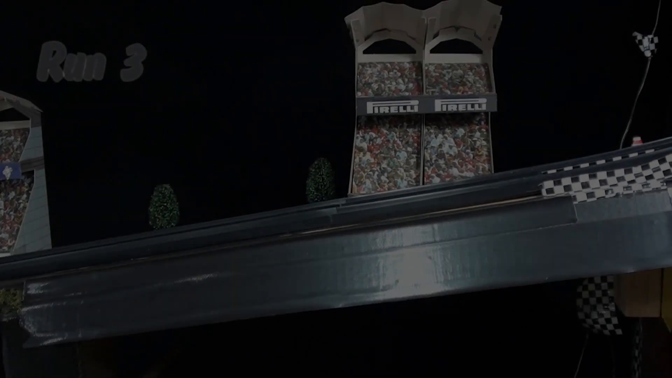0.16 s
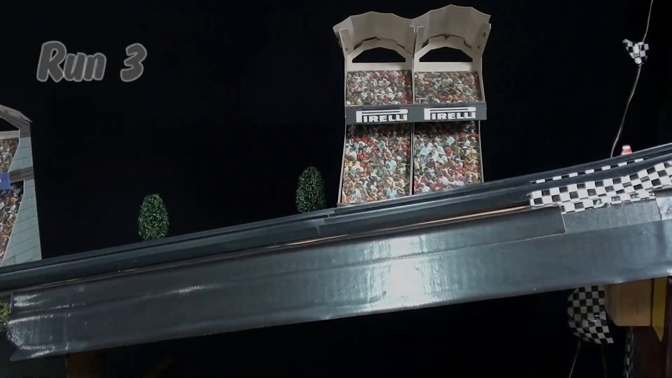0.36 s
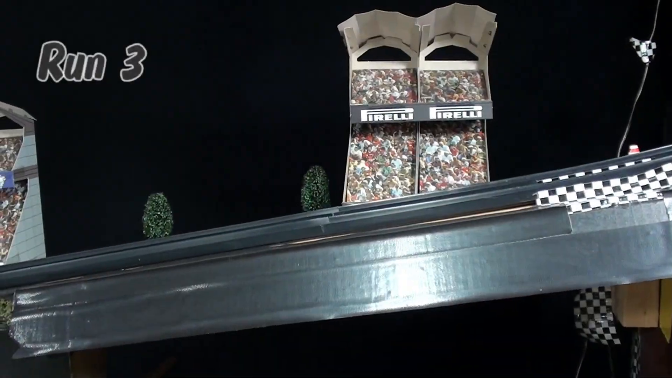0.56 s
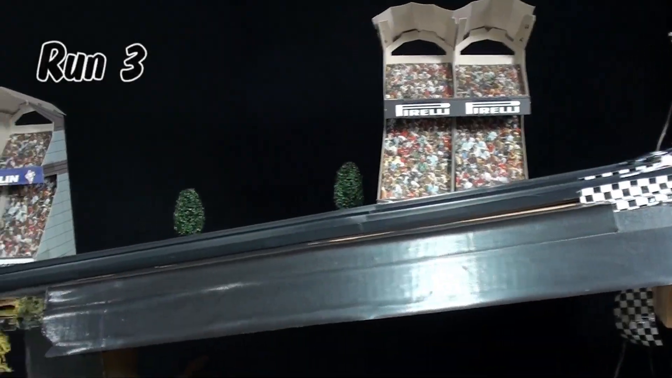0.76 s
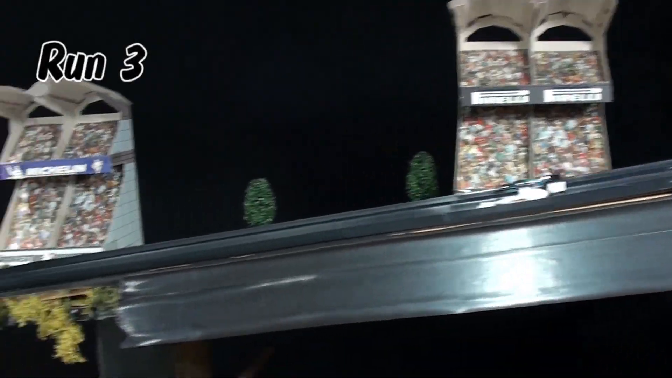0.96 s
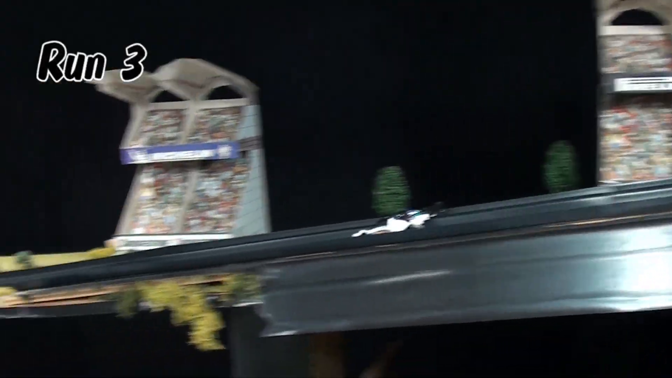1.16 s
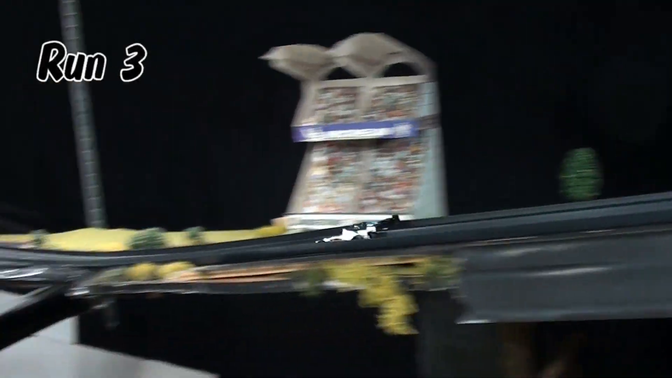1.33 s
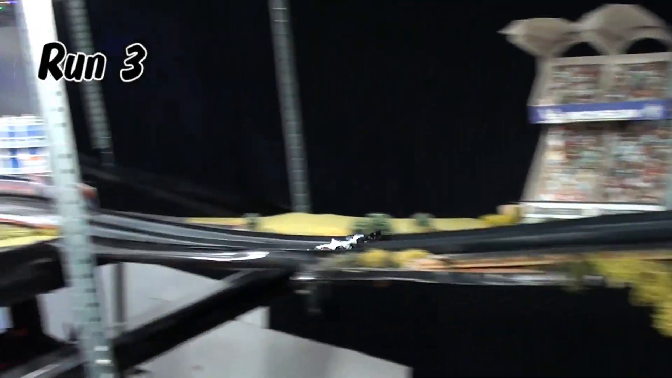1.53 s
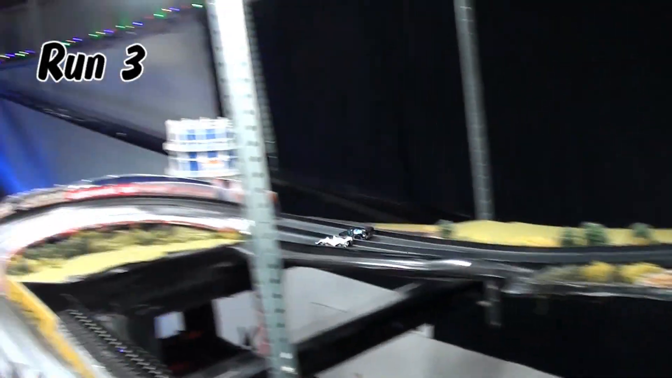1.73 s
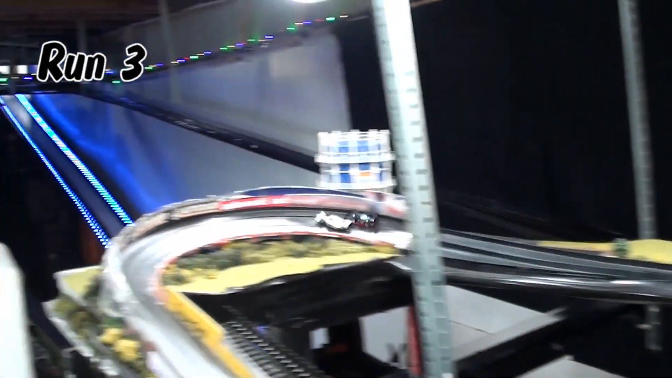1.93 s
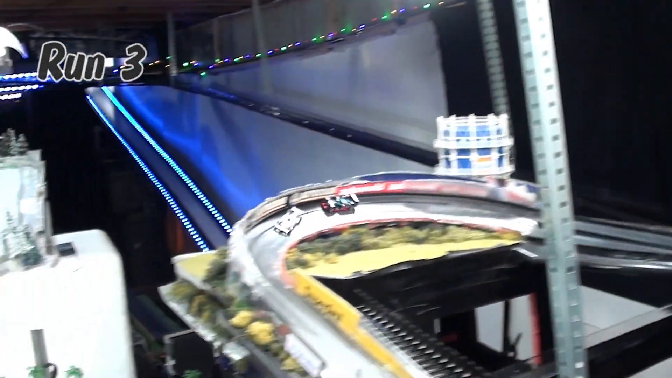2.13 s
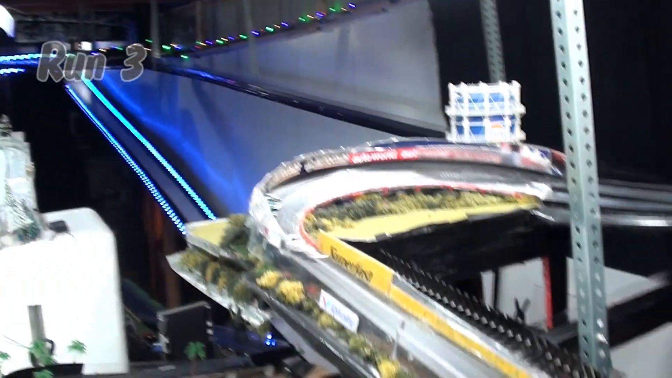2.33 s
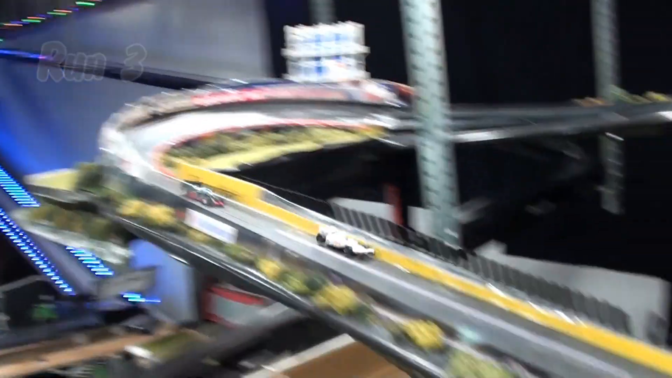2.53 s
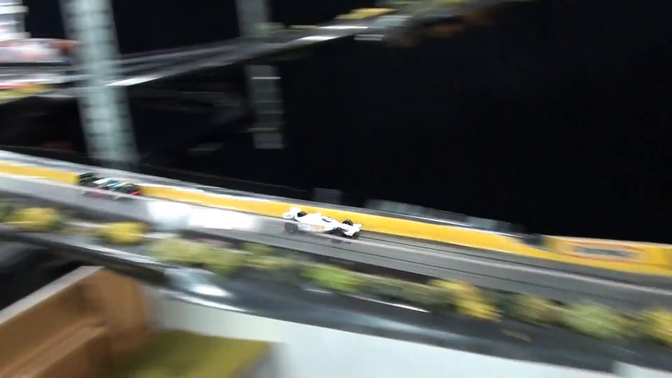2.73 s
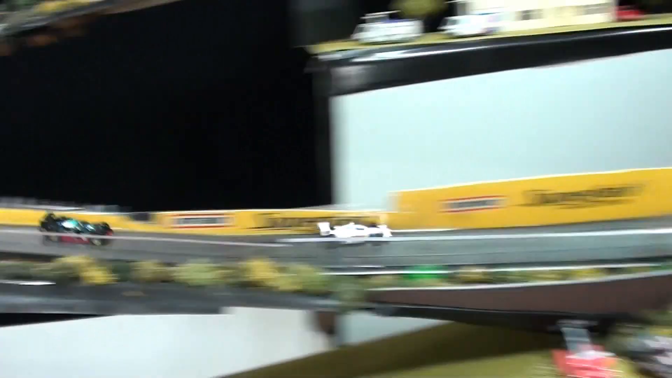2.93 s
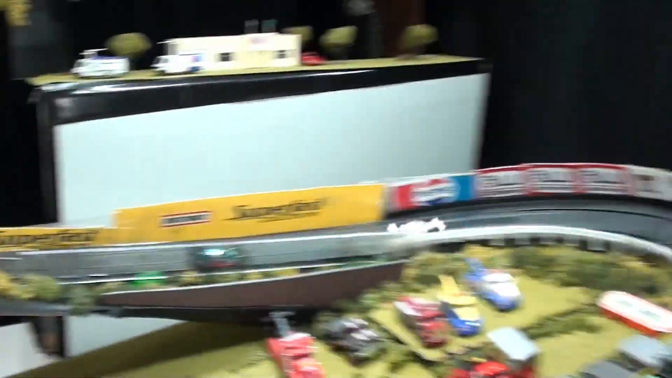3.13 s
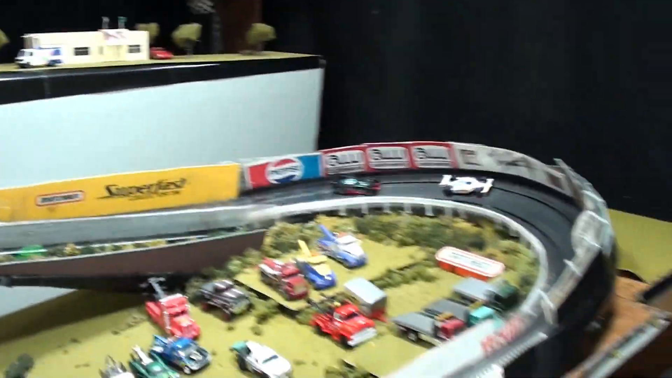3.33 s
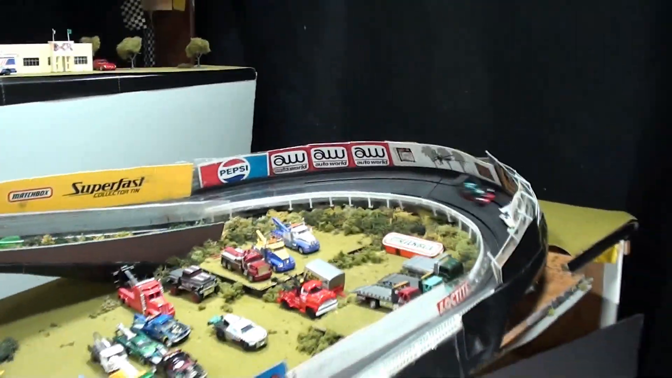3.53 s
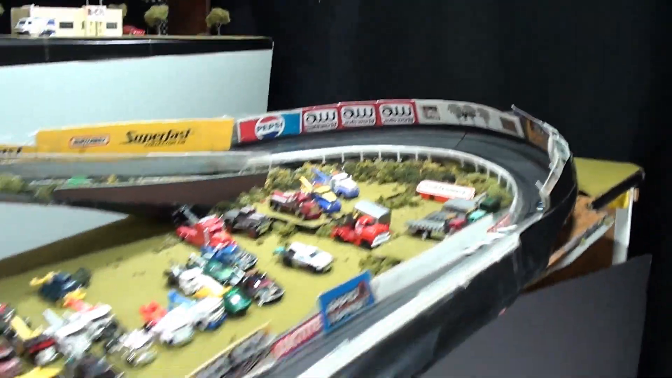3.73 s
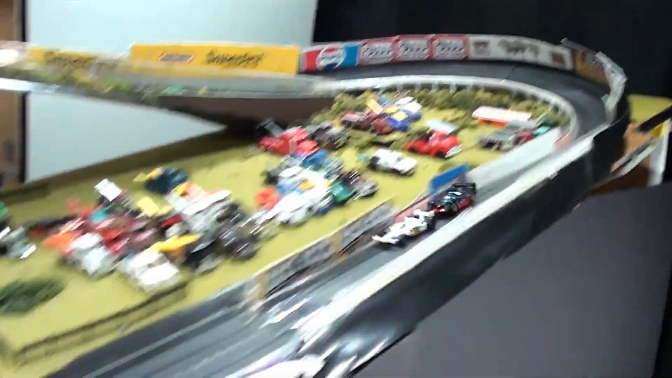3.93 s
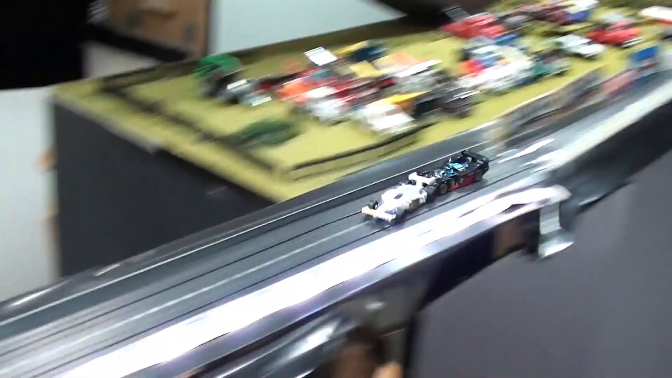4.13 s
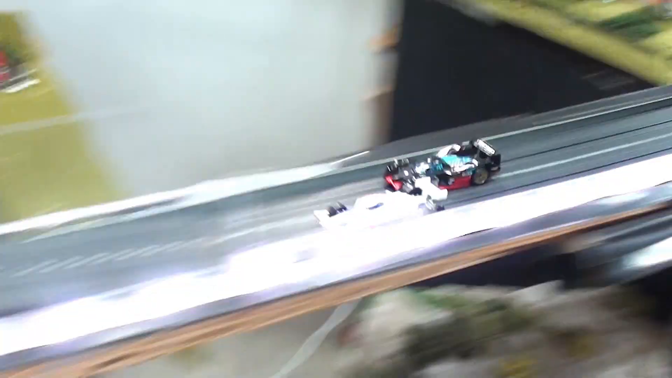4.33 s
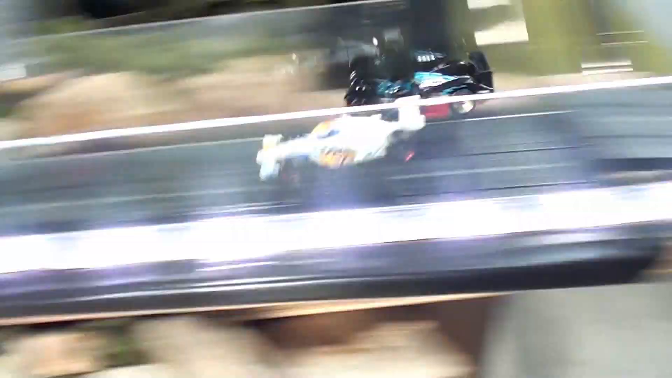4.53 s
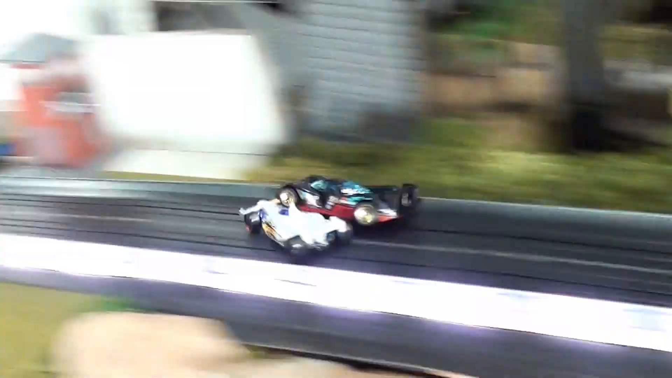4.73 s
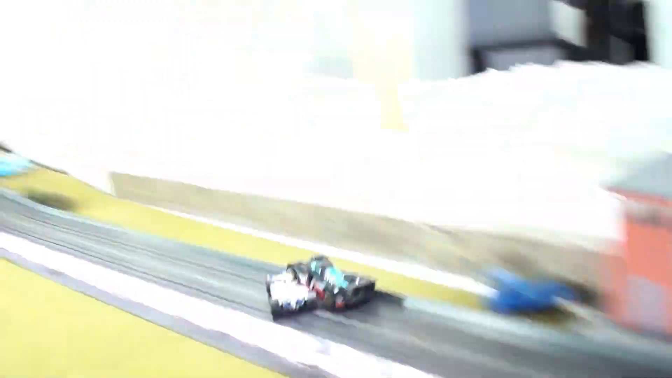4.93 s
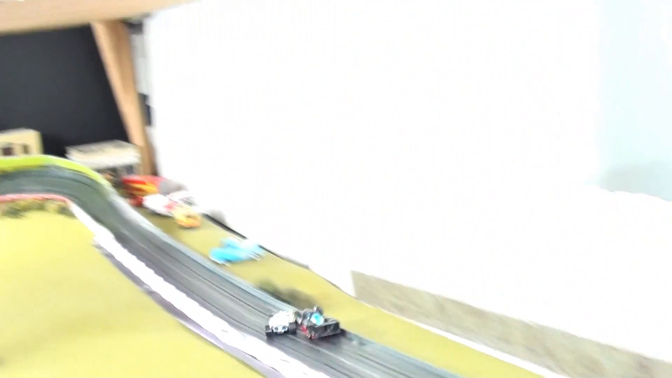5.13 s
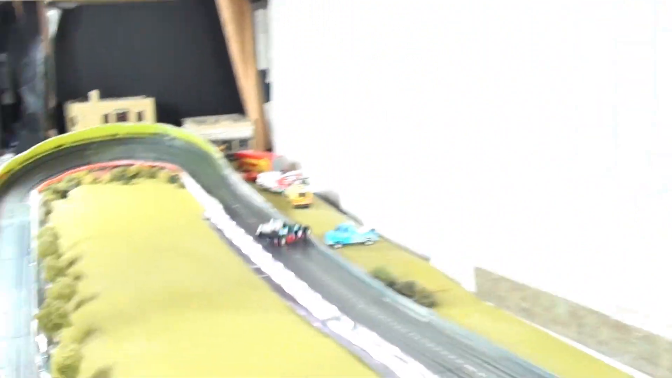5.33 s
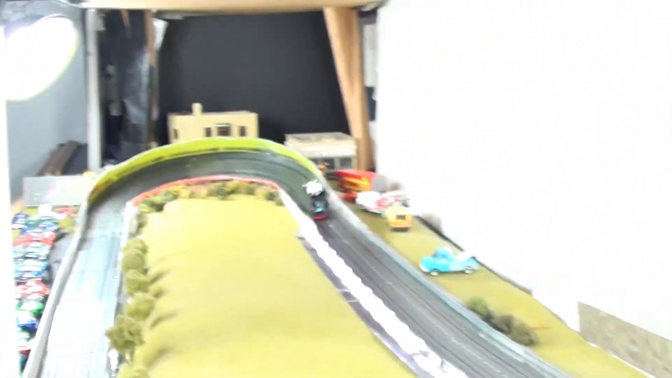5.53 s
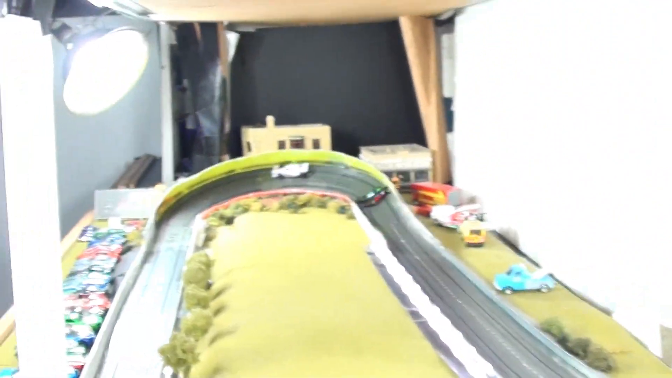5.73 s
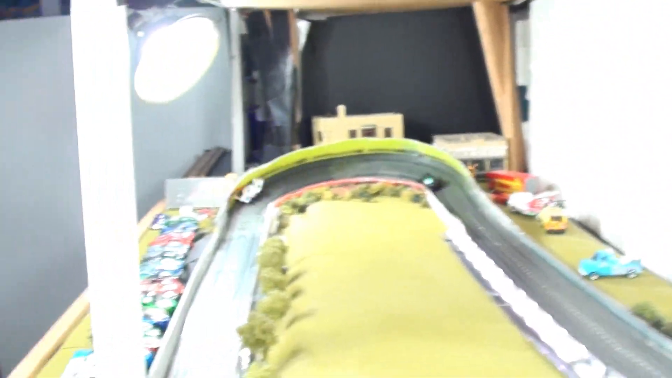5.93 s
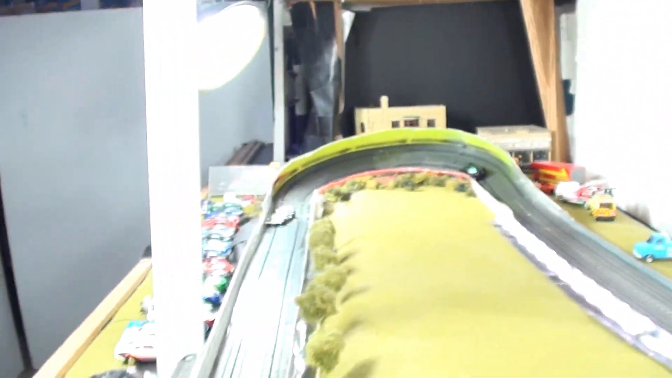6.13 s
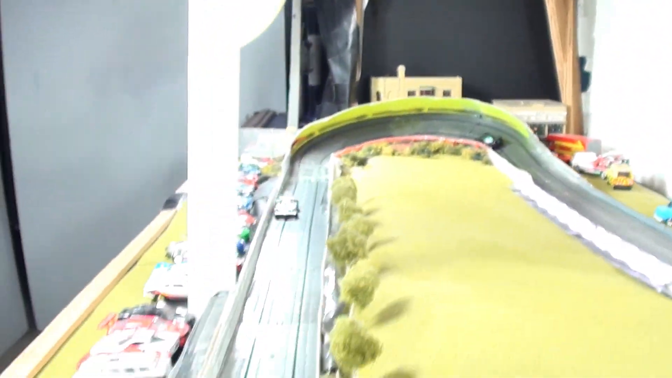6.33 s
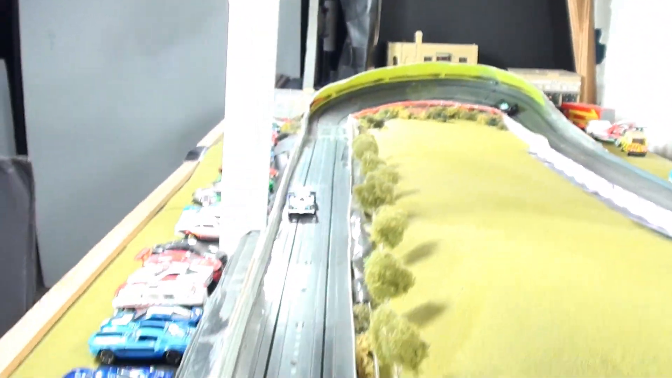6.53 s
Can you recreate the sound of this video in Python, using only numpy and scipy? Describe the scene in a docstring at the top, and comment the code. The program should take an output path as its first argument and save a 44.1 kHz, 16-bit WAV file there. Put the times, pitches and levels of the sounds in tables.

```python
"""Die-cast toy cars race down a long plastic track: random wheel impacts ring each stretch in its own colour.
A starting gate drops with ticks and ringing blows, and quiet noise lies behind it all.
Fuzzy tones sing, whirr, whistle, squeal and drone, and a moving band of wheel noise growls.
Noise bursts clack against rails and other cars, thump over joints and shudder in the track supports.
Brief hops interrupt the rolling and end in a clack; sparse reflections give the room and its width."""
import sys
import numpy as np
from scipy import signal
from scipy.fft import rfft, irfft, next_fast_len
from scipy.io import wavfile
from scipy.ndimage import uniform_filter1d, minimum_filter1d

SR = 44100
rng = np.random.default_rng(int(sys.argv[2]) if len(sys.argv) > 2 else 0)


def wav_record(signal):
    """Record a signal, one row per channel, as 16-bit PCM in the file named by sys.argv[1]."""
    frames = np.transpose(np.atleast_2d(signal))
    bounded = np.clip(frames, -1, 1)
    # unit amplitude maps onto the largest positive 16-bit level
    quanta = np.round(bounded * 32767).astype(np.int16)
    wavfile.write(sys.argv[1], SR, quanta)


N = 289737
TIME = np.arange(N) / SR
BINS = np.fft.rfftfreq(8192, 1 / SR)  # frequency grid of the colours, Hz

# All levels in the tables are relative: the layers are trimmed again in the mix.
# colour of hard contacts: (f/Hz, gain/dB)
CLACK_COLOUR = [(200, -26), (700, -5), (1500, 9), (3000, 7), (4200, 9.5), (7500, 11), (10000, 8.5),
                (13000, 2), (16000, -6)]
# stretches of track: (entry t/s, body level/dB, axle fizz level/dB, chatter depth/dB,
# stray clacks per s, none if negative)
STRETCHES = [(0.0, -35.5, -35.5, 1.5, 0), (1.96, -39.5, -36.5, 2, 6), (2.6, -38.5, -33.5, 2, 6.5),
             (3.22, -37, -33, 2.5, 3), (4.17, -33, -29, 2, 3), (5.29, -35.5, -28, 2.5, 2),
             (5.6, -32.5, -31, 3, 0.5), (6.24, -30.5, -31, 1.5, -1)]
# a car hops and lands: (landing t/s, air time/s, fall of the rolling/dB, landing level/dB, t60/s, ring f/Hz)
HOPS = [(2.557, 0.011, 4, -8, 0.024, 7000), (2.649, 0.027, 8, -12, 0.02, 7500),
        (3.592, 0.013, 10, -18, 0.03, 6700), (4.095, 0.0087, 3, -4.5, 0.03, 7400),
        (4.34, 0.014, 7, -6, 0.022, 11000), (4.6577, 0.056, 15.5, -1, 0.012, 3780),
        (4.729, 0.032, 6.5, -8, 0.019, 2870), (4.902, 0.019, 7, -6, 0.025, 4300),
        (5.2886, 0.026, 8.5, -11.5, 0.04, 4950), (5.5771, 0.02, 6.5, -6, 0.025, 4200),
        (5.61, 0.022, 9.5, -2.5, 0.026, 3890), (5.638, 0.013, 1, -8, 0.025, 4400),
        (5.884, 0.017, 3, -2, 0.016, 4300), (5.915, 0.017, 5, -3, 0.024, 6750),
        (6.025, 0.021, 19, -10, 0.03, 8400), (6.083, 0.012, 3, -8.5, 0.025, 9700),
        (6.1269, 0.019, 22, -7, 0.034, 6300), (6.1857, 0.017, 10, -13, 0.028, 2860),
        (6.2058, 0.017, 7, -12.5, 0.065, 6840), (6.2369, 0.024, 17, -14, 0.035, 7690),
        (6.262, 0.019, 13, -19, 0.03, 3600), (6.409, 0.014, 16, -4, 0.014, 5890),
        (6.4308, 0.011, 19, -19, 0.03, 3850)]


def amp(db):
    """Decibels to gain."""
    return 10 ** (np.asarray(db) / 20)


def evened(x):
    """Scales to an rms of one."""
    return x / np.sqrt(np.mean(x ** 2) + 1e-20)


def read(points, hz):
    """Reads a spectrum on a log-frequency axis."""
    f, value = np.transpose(points)
    return np.interp(np.log(hz + 1), np.log(f + 1), value)


def follow(rows):
    """Each column of a control table at every sample."""
    s, *columns = np.transpose(rows)
    return [np.interp(TIME, s, c) for c in columns]


def during(rows):
    """True between the first and last time of a control table."""
    return (TIME > rows[0][0]) & (TIME < rows[-1][0])


def add(mix, s, sound):
    """Mixes a sound in at time s."""
    part = mix[max(round(s * SR), 0):][:len(sound)]
    part += sound[:len(part)]


def response(db):
    """Minimum-phase impulse response of unit energy, shaped by the gain over BINS."""
    log_gain = np.log(amp(np.maximum(db - db.max(), -100)))
    circle = np.concatenate([log_gain, log_gain[-2:0:-1]])
    spectrum = np.exp(np.conj(signal.hilbert(circle)))
    taps = np.fft.ifft(spectrum).real[:len(BINS) // 2]
    return taps / np.linalg.norm(taps)


def colour(x, db):
    """Rings x through a body with that gain."""
    return signal.oaconvolve(x, response(db))[:len(x)]


def fuzzy_tone(hz, width_hz):
    """A resonance kept ringing by random pushes; hz may be a curve."""
    r = np.exp(-2 * np.pi * width_hz / SR)
    pushes = rng.standard_normal(N) + 1j * rng.standard_normal(N)
    wander = signal.lfilter([1], [1, -2 * r, r * r], pushes)
    carrier = np.exp(2j * np.pi * np.cumsum(hz * np.ones(N)) / SR)
    return evened((wander * carrier).real)


def dying_jolts(jolts, decay_s):
    """Each jolt starts at once and dies away; the result is centred, evened and clipped."""
    shake = signal.lfilter([1], [1, -np.exp(-1 / (decay_s * SR))], jolts)
    return np.clip(evened(shake - shake.mean()), -2, 2)


def chatter(per_s, decay_s):
    """Loose axles jolt at random moments with random strength."""
    jolts = (rng.random(N) < per_s / SR) * rng.uniform(0.082, 1, N)
    return dying_jolts(jolts, decay_s)


def blows(rows, spectrum, rise_s):
    """Each blow is a dying clatter through the struck body, plus one ringing mode."""
    t, out, body = np.arange(SR // 3) / SR, np.zeros(N), response(read(spectrum, BINS))
    for s, db, hz, t60, ring_db in rows:
        fade = amp(db - 60 * t / max(t60, .005)) * (1 - np.exp(-t / rise_s))
        add(out, s, signal.fftconvolve(fade * rng.standard_normal(len(t)), body))
        add(out, s, amp(ring_db) * fade * np.sin(2 * np.pi * hz * t))
    return out


def ambience(db=-60):
    """Low room noise, partly different at each ear, fading in at the start."""
    # colour of the quiet room: (f/Hz, gain/dB)
    room_colour = [(25, -25), (70, -4), (160, -5.5), (400, -1.5), (800, -10.5), (1500, -16), (4500, -19),
                   (9000, -22), (15500, -26)]
    shared, left, right = (colour(rng.standard_normal(N), read(room_colour, BINS)) for _ in range(3))
    fade_in = np.clip((TIME - .38) / 0.033, 0, 1)
    return amp(db) * (shared + 0.31 * np.array([left, right])) * fade_in


def gate():
    """The dropping gate is struck several times, each blow a noise burst with a ringing mode."""
    # blows of the gate: (t/s, level/dB, ring f/Hz, t60/s, ring level/dB)
    gate_blows = [(0.4425, -26, 1190, 0.2, -8), (0.4625, -29, 940, 0.05, -13),
                  (0.4655, -18.5, 3240, 0.053, 0), (0.503, -35, 837, 0.32, -3),
                  (0.5695, -27, 740, 0.094, 3), (0.582, -26.5, 356, 0.18, -1),
                  (0.69, -24.5, 3230, 0.12, -1)]
    # colour of the gate: (f/Hz, gain/dB)
    gate_colour = [(40, -37), (100, -28), (350, -4), (550, -5), (800, 3), (1200, -3), (1800, -4),
                   (3300, -3), (4500, -8), (8000, -9), (11000, -23), (15500, -25)]
    return blows(gate_blows, gate_colour, rise_s=0.00066)


def latch():
    """Single impulses tick as the gate lets go, hits its stop and frees the cars."""
    # ticks: (t/s, level/dB)
    ticks = [(0.4428, -27), (0.4655, -15.5), (0.472, -26), (0.578, -33), (0.587, -32), (0.688, -30),
             (0.705, -29)]
    out = np.zeros(N)
    for s, db in ticks:
        add(out, s, amp(db) * response(read(CLACK_COLOUR, BINS)))
    return out


def stretch_at(s):
    """Number of the stretch of track that the cars are on at time s."""
    return np.searchsorted([row[0] for row in STRETCHES[1:]], s)


def surface():
    """Body level, fizz level and chatter depth under the cars, blending from stretch to stretch."""
    return uniform_filter1d(np.array(STRETCHES)[stretch_at(TIME), 1:4].T, SR // 20, axis=1)


def contact():
    """The cars set off; the rolling falls away while they are in the air and returns as they land."""
    db = np.zeros(N)
    for landing_s, air_s, fall_db, *_ in HOPS:
        add(db, landing_s - air_s, -fall_db * np.sqrt(np.linspace(0, 1, round(air_s * SR))))
    set_off = np.clip((TIME - .565) / 0.038, 0, 1)
    return amp(uniform_filter1d(db, SR // 700)) * set_off


def patter(per_s, spread_db):
    """Random tiny impacts of uneven strength."""
    size = amp(spread_db * np.clip(rng.standard_normal(N), -2, 2)) * rng.choice([-1, 1], N)
    return evened(size * (rng.random(N) < per_s / SR))


def shifting(x, patch_hz=420, patch_s=.014, depth_db=2.5):
    """Each spot under the wheels favours other modes of the track, so brief resonances come and go."""
    hz, t, z = signal.stft(x, SR, nperseg=512, noverlap=384)
    patches = rng.standard_normal(z.shape)
    patches = uniform_filter1d(patches, max(round(patch_hz / hz[1]), 1), axis=0)
    patches = uniform_filter1d(patches, max(round(patch_s / t[1]), 1), axis=1)
    z = z * amp(depth_db * np.clip(evened(patches), -2, 2))
    return evened(signal.istft(z, SR, nperseg=512, noverlap=384)[1][:N])


def wobble(wander_depth=.25, jolt_s=0.0039, spread_db=6):
    """Each car jolts on its loose axles about once a wheel turn, never quite evenly."""
    # mean wobble rate of each of two cars: [f/Hz]
    wobble_hz = [68.3, 111.9]
    jolts = np.zeros(N)
    for hz in wobble_hz:
        wander = evened(uniform_filter1d(rng.standard_normal(N), SR // 60))
        turns = np.cumsum(hz * np.exp(wander_depth * wander)) / SR + rng.random()
        new_turn = np.diff(np.floor(turns), prepend=0)
        jolts += new_turn * amp(spread_db * rng.standard_normal(N))
    return dying_jolts(jolts, jolt_s)


def wheels():
    """The tiny impacts of the wheels, bunched into a rattle by the wobble of the axles."""
    shake = amp(surface()[2] * wobble())
    shake /= np.sqrt(uniform_filter1d(shake ** 2, SR // 30))  # jolts bunch the energy without adding any
    return shifting(patter(per_s=5500, spread_db=3.0)) * shake * contact()


def scraping(decay_s=0.11):
    """Lift of the fizz in dB as cars scrape along a rail: it jumps up and dies away."""
    # scrapes: (t/s, lift/dB)
    scrapes = [(1.47, 7), (1.71, 5), (1.98, 6), (3.211, 6)]
    lift = np.zeros(N)
    for s, lift_db in scrapes:
        add(lift, s, lift_db * np.exp(-TIME / decay_s))
    return lift


def band_levels(body_db, fizz_db):
    """Levels of rumble, body, rush and fizz: one drive moves the upper three, each by its own amount."""
    # how loudly the cars roll, with their speed and nearness: (t/s, level/dB)
    drive_curve = [(0.63, -29), (0.71, -18), (0.81, -17.5), (0.87, -13), (1.15, -7), (1.4, -6.5),
                   (1.74, -2), (2.1, -0.5), (2.39, 2.5), (2.58, -2.5), (2.78, 1), (2.92, 0), (3.14, 3.5),
                   (3.28, -5), (3.44, -5.5), (3.6, -1), (3.72, -0.5), (4.07, -4.5), (4.22, 0), (4.48, 2.5),
                   (4.7, -1.5), (4.9, 2.5), (5.45, 0.5), (5.68, -1), (5.9, -3), (6.2, -4.5), (6.3, -3),
                   (6.39, -7), (6.47, -3.5), (6.55, -4)]
    # rumble of the deck, strongest where the track is loosely held: (t/s, level/dB)
    rumble_curve = [(0.6, -52), (1.35, -51), (1.6, -45.5), (2.0, -41), (2.22, -49.5), (2.55, -45.5),
                    (2.85, -42), (3.1, -47), (3.36, -38), (3.7, -51.5), (4.03, -42.5), (4.18, -54),
                    (4.5, -50), (4.72, -40.5), (4.85, -45), (5.2, -49.5), (5.45, -45.5), (5.72, -39),
                    (6.05, -43.5), (6.3, -53.5)]
    body_slope, fizz_slope = 0.67, 1.03  # dB per dB of drive: faster cars sound brighter
    rush_db = -26.5  # at a drive of 0 dB
    uneven_db, uneven_s = 1.5, 0.054  # the deck answers more or less from spot to spot
    drive_db, = follow(drive_curve)
    rumble_db, = follow(rumble_curve)
    spots = rng.standard_normal((2, 1000))
    low_db, middle_db = (uneven_db * np.interp(TIME / uneven_s, np.arange(len(row)), row) for row in spots)
    return [rumble_db + low_db,
            body_db + body_slope * drive_db + middle_db,
            rush_db + drive_db,
            fizz_db + fizz_slope * drive_db + scraping()]


def rolling(drive, splits_hz=(700, 2500, 7500)):
    """The wheel impacts ring the stretch of track that the cars are on."""
    # colour of each stretch: (f/Hz, gain/dB)
    ramp = [(35, -51), (60, -38), (183, -19.5), (220, -23.5), (423, -17), (559, -25.5), (673, -14.5),
            (792, -13.5), (1100, -4.5), (1200, -7), (1290, -3), (2250, 0.5), (3500, -1.5), (6560, -3),
            (15500, -25)]
    first_bend = [(24, -63.5), (40, -37), (93, -36), (126, -45), (192, -12), (461, -15), (722, -13),
                  (838, -11), (926, -2.5), (1490, -4), (6160, 3.5), (8520, 3), (15500, -5)]
    back_straight = [(35, -64), (60, -30.5), (123, -26), (192, -4), (312, -2), (343, -5), (509, 0),
                     (585, -2), (673, -3), (756, 2.5), (3270, -1), (7370, -4), (15500, -22.5)]
    second_bend = [(40, -42.5), (70, -27), (140, -30), (206, -20.5), (327, -16.5), (546, -20.5),
                   (627, -18.5), (1020, -2), (1960, -4), (2980, 8.5), (4200, 13), (6870, 14.5), (10900, 8),
                   (15500, -4.5)]
    near_straight = [(35, -65), (60, -37), (132, -19.5), (192, -21.5), (226, -14.5), (312, -18.5),
                     (359, -18.5), (627, -14.5), (792, -8.5), (869, -8), (1380, -2), (2250, 1.5),
                     (4120, 10), (7200, 4.5), (15500, -20)]
    approach = [(35, -60), (60, -38), (132, -20), (300, -12), (600, -16), (1150, -10), (1450, -3.5),
                (2100, -4), (2800, -2.5), (4000, 4), (5500, 2), (6900, 0), (9000, -4.5), (15500, -23.5)]
    last_bend = [(35, -45), (60, -33), (123, -13.5), (180, -8), (226, -7), (312, -1.5), (403, -8.5),
                 (546, -10), (721, -12), (1070, -8), (1230, -1.5), (2590, -6), (3930, -2), (8090, -6),
                 (11000, -15.5), (15500, -27)]
    run_out = [(35, -54), (60, -12), (312, -13), (385, -19), (486, -9.5), (642, -21), (688, -9), (738, -21),
               (810, -12), (1320, -12.5), (1550, -2.5), (2050, -8), (4220, 4), (7720, -3), (15500, -27)]
    # resonances and dips in those colours: (stretch number, f/Hz, width/Hz, lift/dB)
    resonances = [(0, 430, 70, 4), (0, 680, 90, 3), (1, 763, 80, 8.5), (3, 544, 60, 7), (4, 781, 110, -5),
                  (4, 1430, 200, 4), (4, 1690, 250, 5.5), (4, 7600, 500, -3), (5, 760, 70, 10),
                  (5, 3850, 400, 2.5), (6, 726, 80, 7.5), (7, 1670, 300, -3.5), (7, 2850, 302, 4),
                  (7, 3920, 600, 5), (7, 6100, 503, 5)]
    spectra = [ramp, first_bend, back_straight, second_bend, near_straight, approach, last_bend, run_out]
    body_db, fizz_db, _ = surface()
    stretch = stretch_at(TIME)
    below = [0 * BINS] + [1 / (1 + (BINS / hz) ** 12) for hz in splits_hz] + [1 + 0 * BINS]
    shares_db = 10 * np.log10(np.abs(np.diff(below, axis=0)) + 1e-12)  # rumble, body, rush and fizz
    parts = np.zeros((len(shares_db), N))
    for k, spectrum in enumerate(spectra):
        peaks_db = sum(lift / (1 + (2 * (BINS - hz) / width) ** 2)
                       for at, hz, width, lift in resonances if round(at) == k)
        here = uniform_filter1d(1. * (stretch == k), SR // 20)  # one stretch blends into the next
        on = np.flatnonzero(here > 1e-6)
        for part, share_db in zip(parts, shares_db):
            track = response(read(spectrum, BINS) + peaks_db + share_db)
            add(part, on[0] / SR, signal.fftconvolve(drive[on] * np.sqrt(here[on]), track))
    return amp(-2.5) * (amp(band_levels(body_db, fizz_db)) * parts).sum(0)


def singing():
    """Metal bodies and axles ring in thin lines down the ramp, fading out as the first bend begins."""
    # modes of the cars: (f/Hz, width/Hz, level/dB)
    chassis = [(2180, 50, -9), (3100, 160, -1), (4500, 190, -7), (5620, 84, -11.5), (6400, 130, -8),
               (8120, 230, -7), (10600, 110, -20)]
    # strength of the singing: (t/s, level/dB)
    strength = [(0.57, -63), (0.6, -60), (0.85, -38.5), (1.2, -35.5), (1.6, -30), (1.95, -42), (2.1, -60)]
    db, = follow(strength)
    lines = sum(amp(mode_db) * fuzzy_tone(hz, width_hz) for hz, width_hz, mode_db in chassis)
    return during(strength) * amp(db) * lines


def whistle(flicker_db=2.5):
    """A dry axle whistles thinly and fitfully on the ramp, as one narrow resonance."""
    # strength of the whistle: (t/s, level/dB)
    strength = [(0.575, -72), (0.595, -64), (0.72, -61), (1.05, -51.5), (1.5, -50.5), (2.05, -62)]
    db, = follow(strength)
    flicker = evened(amp(flicker_db * chatter(per_s=27, decay_s=.03)))
    return amp(db) * flicker * fuzzy_tone(9305, width_hz=28) * during(strength)


def squeals():
    """A dry axle catches and rings for a moment, each time at another pitch."""
    # squeals: (t/s, length/s, f/Hz, level/dB)
    catches = [(0.585, 0.056, 6650, -50), (0.672, 0.045, 6860, -43), (0.795, 0.14, 1890, -40),
               (1.154, 0.018, 4495, -30), (2.356, 0.063, 5330, -30), (4.598, 0.023, 3500, -35),
               (4.996, 0.035, 7200, -21), (5.102, 0.022, 3990, -23), (5.124, 0.062, 2930, -26.5),
               (5.185, 0.04, 7250, -28), (5.358, 0.14, 6820, -26), (5.72, 0.029, 3950, -22),
               (6.432, 0.12, 4050, -29)]
    hz, level = np.zeros(N), np.zeros(N)
    for s, length_s, pitch_hz, db in catches:
        swell = np.sin(np.linspace(0, np.pi, round(length_s * SR)))
        add(level, s, amp(db) * swell)
        hz[round(s * SR):] = pitch_hz
    return level * fuzzy_tone(hz, width_hz=170)


def whirr(rough_db=2.5):
    """Wheels and smooth ramp ring with a rasp, in swells whose pitch sinks as the slope flattens out."""
    # swells of the whirr: (t/s, f/Hz, level/dB)
    swells = [(0.68, 1957, -47), (0.85, 1950, -40.5), (1.0, 2087, -52.5), (1.08, 2365, -35),
              (1.2, 2210, -43), (1.32, 2190, -33), (1.46, 2150, -40), (1.5, 2124, -26.5), (1.55, 2150, -43),
              (1.64, 2207, -31), (1.72, 2153, -35), (1.79, 1966, -34), (1.85, 1700, -47), (1.92, 1600, -56)]
    # its resonances: (multiple of its pitch, width/Hz, level/dB)
    modes = [(1.0, 212, 1.5), (1.4, 240, -6.5)]
    hz, db = follow(swells)
    ring = sum(amp(mode_db) * fuzzy_tone(multiple * hz, width_hz) for multiple, width_hz, mode_db in modes)
    rasp = evened(amp(rough_db * chatter(per_s=99, decay_s=0.0065)))
    return amp(db) * ring * rasp * during(swells)


def growl(drive):
    """The wheels drive one broad resonance of the track bed, which moves as the cars travel."""
    # swells where the cars press into the bed: (t/s, centre f/Hz, level/dB)
    swells = [(0.7, 1050, -53), (0.85, 1160, -38.5), (1.0, 1400, -57), (1.62, 2180, -36.5),
              (1.73, 2070, -29), (1.83, 1650, -32), (1.94, 1520, -33), (1.99, 1200, -44),
              (2.68, 2180, -35.5), (2.78, 2180, -36), (2.96, 1770, -30.5), (3.14, 1380, -34.5),
              (3.3, 1300, -43.5), (4.14, 1880, -34.5), (4.21, 1680, -31), (4.29, 1700, -30),
              (4.36, 1580, -41.5), (4.95, 1680, -37), (5.06, 1856, -34), (5.2, 1800, -47.5)]
    # half width of the band, narrowest on the ramp: (t/s, width/octaves)
    half_width = [(1.9, 0.56), (2.7, .62)]
    centre_hz, db = follow(swells)
    hz, t, z = signal.stft(drive, SR, nperseg=512, noverlap=384)
    octaves_off = np.log2((hz[:, None] + 1) / np.interp(t, TIME, centre_hz))
    width_octaves = np.interp(t, *np.transpose(half_width))
    band = 1 / (1 + np.abs(octaves_off / width_octaves) ** 4)
    band /= np.sqrt(np.mean(band ** 2, axis=0))
    return amp(db) * signal.istft(z * band, SR, nperseg=512, noverlap=384)[1][:N]


def thumps():
    """Wheels cross a joint, or a car lurches into motion: a soft-edged noise burst and a ringing mode of the
    deck."""
    # bumps over joints, the first as the second car sets off: (t/s, level/dB, ring f/Hz, t60/s, ring level/dB)
    bumps = [(0.835, -30, 1180, 0.25, -5), (1.102, -22.5, 670, 0.11, 7), (1.14, -27, 566, 0.056, 2),
             (1.445, -27, 978, 0.095, 7), (1.898, -22.5, 885, 0.24, 5.5), (2.057, -17, 718, 0.14, -2),
             (2.117, -30, 338, 0.074, 10.5), (2.586, -16, 827, 0.08, 2.5), (2.826, -18.5, 855, 0.21, -3.5),
             (3.025, -23, 519, 0.079, 10), (3.163, -17, 527, 0.092, 9), (3.167, -20.5, 1057, 0.097, 9.5),
             (3.287, -11.5, 1120, 0.055, 2), (3.425, -20.5, 480, 0.14, -3), (4.608, -16, 788, 0.11, -2),
             (4.664, -10, 1314, 0.032, 8), (4.677, -11.5, 1230, 0.064, -3),
             (4.732, -16.5, 1410, 0.061, 6.5), (4.704, -17, 370, 0.11, -2), (4.98, -20, 485, 0.085, -11),
             (5.072, -20, 790, 0.068, -2.5), (5.18, -25, 760, 0.066, -3.5), (5.31, -18.5, 675, 0.083, -10),
             (5.858, -25, 342, 0.08, 8), (5.985, -22.5, 305, 0.13, 3.5), (6.212, -20.5, 1370, 0.019, 20.5)]
    # colour of the deck: (f/Hz, gain/dB)
    deck_colour = [(30, -60), (70, -28), (130, -21), (300, 9.5), (800, 14.5), (1300, 14.5), (2500, -13),
                   (6000, -38)]
    return blows(bumps, deck_colour, rise_s=0.0029)


def stray_clacks(count=200):
    """Light knocks at random moments, at each stretch's own rate: (s, level dB, t60 s, ring Hz)."""
    # lowest and highest ring of the struck parts: (f/Hz, f/Hz)
    ring_range = (3500, 10500)
    place, chance, strength, length, part = rng.random((count, 5)).T
    slot_s = N / SR / count
    s = (np.arange(count) + place) * slot_s
    per_s = np.array(STRETCHES)[stretch_at(s), -1]
    level_db = -6 + 3 * (2 * strength - 1)
    t60_s = 0.015 * (.5 + length)
    rows = np.transpose([s, level_db, t60_s, np.interp(part, [0, 1], ring_range)])
    return rows[chance < per_s * slot_s]


def clacks(tick=1.22, rise_s=0.00062):
    """Knocks and landings: two axles hit in turn, each a tick and a dying buzz that rings the struck part."""
    # a car strikes a rail or its neighbour hard: (t/s, level/dB, clatter t60/s, ring f/Hz)
    knocks = [(1.049, -19, 0.025, 2400), (1.076, -19, 0.03, 2600), (1.103, -10.5, 0.04, 5560),
              (1.111, -16, 0.036, 2700), (1.121, -9.5, 0.05, 2750), (1.141, -17, 0.025, 2900),
              (1.159, -17, 0.04, 4500), (1.973, -14, 0.014, 7400), (1.984, -6.5, 0.049, 10800),
              (1.993, -8, 0.025, 9000), (2.034, -7.5, 0.055, 8440), (2.056, -4, 0.046, 6400),
              (2.104, -6, 0.045, 5030), (2.12, -5.5, 0.027, 7560), (2.162, -6, 0.025, 10900),
              (2.207, -7, 0.016, 6000), (2.249, -4, 0.025, 6400), (2.276, -6, 0.02, 8700),
              (2.347, -19, 0.026, 5300), (2.372, -8, 0.025, 4450), (2.587, -9, 0.056, 11700),
              (2.621, -7, 0.032, 9000), (2.667, -7, 0.052, 3300), (2.707, -6, 0.02, 7400),
              (2.776, -9, 0.018, 11000), (2.89, -7, 0.022, 9300), (2.966, -8, 0.03, 4960),
              (3.014, -5, 0.03, 6700), (3.03, -6, 0.02, 11700), (3.213, -1.5, 0.03, 9900),
              (3.241, -5, 0.025, 6700), (3.255, -2, 0.024, 9000), (3.29, -1.5, 0.018, 8300),
              (3.306, 1, 0.018, 8650), (3.317, -2, 0.018, 7800), (3.333, -5, 0.025, 5600),
              (3.341, -6, 0.014, 6900), (3.35, 1, 0.031, 7000), (3.367, -7, 0.018, 8380),
              (3.393, -2, 0.016, 3800), (3.4037, 1.5, 0.011, 10500), (3.428, -0.5, 0.013, 6000),
              (3.438, -3, 0.033, 6700), (3.461, -4, 0.024, 4690), (3.471, -3, 0.022, 11100),
              (3.493, -2, 0.028, 5620), (3.503, -6, 0.016, 8540), (3.525, -4.5, 0.021, 6710),
              (3.557, -7, 0.025, 6700), (3.574, -2, 0.016, 8550), (3.637, -5, 0.018, 6900),
              (3.774, -6, 0.017, 6950), (3.801, -6, 0.023, 10100), (3.837, -11, 0.018, 2894),
              (3.854, -4, 0.014, 7600), (3.878, -2, 0.016, 7400), (3.896, -5.5, 0.039, 3400),
              (3.918, -1, 0.016, 11100), (3.974, -5, 0.016, 3000), (3.988, -3, 0.02, 7820),
              (3.996, -1, 0.018, 10820), (4.013, -4, 0.013, 10300), (4.047, -8, 0.018, 10700),
              (4.061, -4, 0.022, 7200), (4.121, -3.5, 0.019, 6700), (4.14, -7, 0.012, 7500),
              (4.3244, -2, 0.016, 8340), (4.5995, -11.5, 0.014, 3490), (4.609, -11.5, 0.018, 6800),
              (4.654, -5, 0.0071, 7000), (4.6645, -4, 0.015, 4320), (4.674, -5, 0.03, 4100),
              (4.6855, -1, 0.018, 5500), (4.695, -7, 0.027, 7100), (4.7075, 0, 0.016, 6600),
              (4.752, -15, 0.018, 4050), (4.7634, -6, 0.021, 6550), (5.538, -2, 0.024, 4400),
              (5.681, -7.5, 0.22, 4020), (5.767, -8, 0.053, 5550), (5.827, -13, 0.025, 6750),
              (5.931, -15, 0.022, 4200), (5.972, -11.5, 0.15, 7950), (6.033, -8, 0.025, 10500),
              (6.047, -5.5, 0.037, 7940), (6.071, -7, 0.025, 2300), (6.0887, -5, 0.018, 10500),
              (6.098, -4, 0.02, 3800), (6.135, -7.5, 0.025, 8500), (6.142, -6, 0.023, 9700),
              (6.167, -21, 0.023, 4200), (6.305, -15, 0.037, 4870), (6.349, -11, 0.027, 6580),
              (6.382, -16.5, 0.035, 4200), (6.469, -5, 0.014, 4100), (6.5155, 0, 0.013, 3800),
              (6.5335, -13, 0.017, 7800), (6.556, -4.5, 0.022, 3780)]
    ring_lift_db, ring_width_hz = 11, 730  # the struck part rings above the common colour
    second_s, second_db = .003, -7.5  # mean delay and relative level of the second axle
    t, out, touching = np.arange(SR // 5) / SR, np.zeros(N), contact()
    landings = [(s, *landing) for s, _, _, *landing in HOPS]
    strays = [row for row in stray_clacks() if touching[int(row[0] * SR)] > .7]
    common_db = read(CLACK_COLOUR, BINS)
    for s, db, t60, ring_hz in list(knocks) + landings + strays:
        part = response(common_db + ring_lift_db / (1 + (2 * (BINS - ring_hz) / ring_width_hz) ** 2))
        fade = amp(-60 * t / max(t60, .005)) * (1 - np.exp(-t / rise_s))
        for delay_s, hit_db in [(0, db), (second_s * (.5 + rng.random()), db + second_db)]:
            buzz = rng.standard_normal(len(t)) * fade
            buzz[0] = tick
            add(out, s + delay_s, amp(hit_db) * signal.fftconvolve(buzz, part))
    return out


def drone(width_hz=26):
    """The wheels keep a low mode of the loosely held deck ringing, in uneven swells."""
    # swells of the drone: (t/s, f/Hz, level/dB)
    swells = [(1.9, 188, -84), (2.05, 191.3, -52), (2.22, 194.7, -68), (2.38, 200.3, -57),
              (2.5, 190.3, -61), (2.78, 188.4, -52), (2.95, 189, -60), (3.13, 197, -46), (3.22, 191, -50.5),
              (3.4, 198.3, -52), (3.55, 206.4, -53), (3.85, 210, -55), (4.0, 200, -63)]
    hz, db = follow(swells)
    return amp(db) * fuzzy_tone(hz, width_hz) * during(swells)


def thuds():
    """The supports of the track shudder: a slow-edged low noise burst and a ringing mode."""
    # shudders: (t/s, level/dB, ring f/Hz, t60/s, ring level/dB)
    shudders = [(2.59, -35, 74.7, 0.081, 3), (3.96, -48, 69.9, 0.18, 7), (4.04, -38, 60, 0.14, 1.5),
                (4.74, -49, 75, 0.18, 4), (6.0, -41.5, 139, 0.13, 8), (6.135, -38, 142, 0.27, 1)]
    # colour of the supports: (f/Hz, gain/dB)
    support_colour = [(25, -8), (50, -22), (110, 0), (200, -5), (500, -18), (2000, -57)]
    return blows(shudders, support_colour, rise_s=0.0055)


def room(x, count=5):
    """Sparse reflections, decaying at a rate set by frequency, cycle through a few patterns as the cars move."""
    # decay of the room: (f/Hz, t60/s)
    decay = [(100, 0.18), (500, 0.43), (2000, 0.16), (8000, 0.17), (16000, 0.041)]
    taps = rng.choice([-1., 1.], (count, SR // 2)) * (rng.random((count, SR // 2)) < 3000 / SR)
    taps[:, :SR // 400] = 0  # gap ahead of the first reflection
    hz, t, z = signal.stft(taps, SR, nperseg=256)
    tails = signal.istft(z * amp(-60 * t / read(decay, hz)[:, None]), SR, nperseg=256)[1]
    place, out = TIME * 10, np.zeros(N)  # ten crossfades a second, cycling through the same few patterns
    for k, tail in enumerate(tails):
        near = np.sin(np.pi / 2 * np.minimum((place - k) % count, 2))
        out += signal.oaconvolve(x * near, tail / np.linalg.norm(tail))[:N]
    return out


def scene():
    """The cars stay in the centre; their reflections spread to the sides, over the quiet room noise."""
    # gain of the side reflections: (f/Hz, gain/dB)
    width = [(60, -18), (130, -36), (250, -38), (600, -26.5), (2000, -21), (6000, -18), (8000, -21.5),
             (10000, -58), (14000, -51)]
    cars = rolling(wheels()) + amp(-1.5) * growl(wheels())
    cars += amp(-2.5) * whirr() + amp(-9.0) * singing() + whistle() + drone() + amp(-4.5) * squeals()
    cars += amp(-14.0) * clacks() + latch()
    cars += amp(-13.0) * gate() + amp(-12.5) * thumps() + amp(-7.5) * thuds()
    far = amp(np.interp(TIME, [0.8, 2.1], [4, 0]))  # the top of the ramp is further off, so more room is heard
    mid = cars + amp(-14.5) * room(far * cars)
    size = next_fast_len(2 * N)
    spread = amp(read(width, np.fft.rfftfreq(size, 1 / SR)))
    side = irfft(rfft(room(far * cars), size) * spread, size)[:N]
    return np.array([mid + side, mid - side]) + ambience()


def record(dry, threshold_db=-22, attack_s=0.0024, ceiling_db=-11, edge_hz=15950):
    """A fast compressor evens out the loudest rattle and a limiter holds the peaks; then the band limit."""
    keep = np.exp(-1 / (attack_s * SR))  # the front of each clack slips past the compressor
    power = signal.lfilter([1 - keep], [1, -keep], (dry ** 2).mean(0))
    power_db = 10 * np.log10(power + 1e-12)
    dry = dry * amp(-np.maximum(power_db - threshold_db, 0))
    allowed = np.minimum(1, amp(ceiling_db) / (np.abs(dry).max(0) + 1e-9))
    held = dry * uniform_filter1d(minimum_filter1d(allowed, SR // 1000), SR // 1000)
    low_pass = signal.firwin(511, edge_hz, window=("kaiser", 9), fs=SR)
    return signal.oaconvolve(held, low_pass[None], "same")


dry = scene()
out = record(dry)
wav_record(out)
```